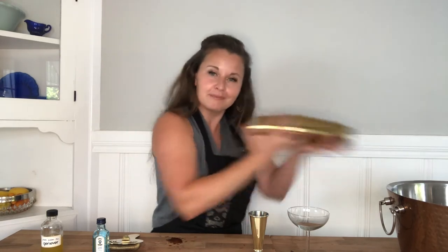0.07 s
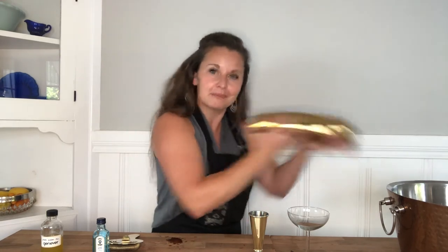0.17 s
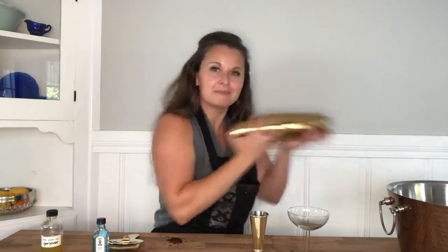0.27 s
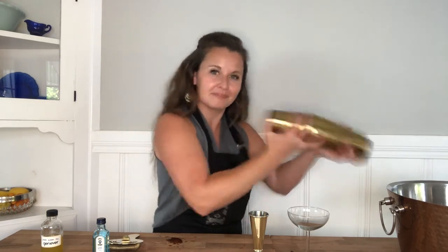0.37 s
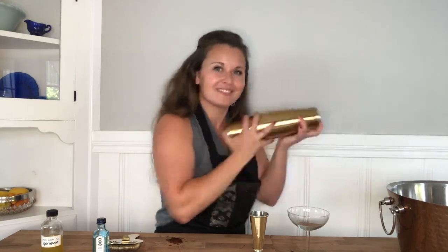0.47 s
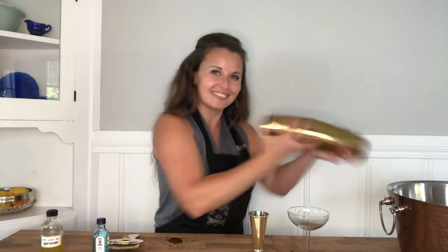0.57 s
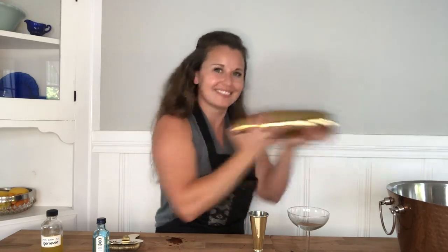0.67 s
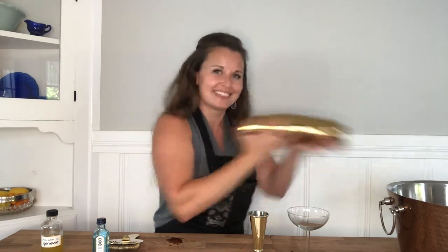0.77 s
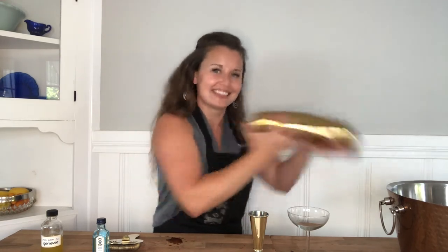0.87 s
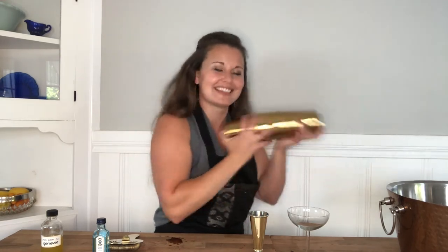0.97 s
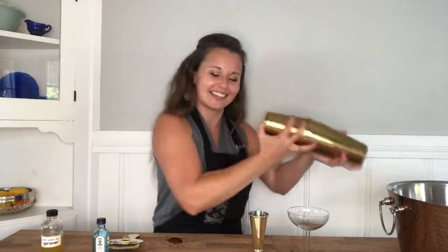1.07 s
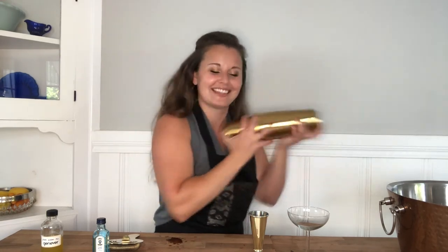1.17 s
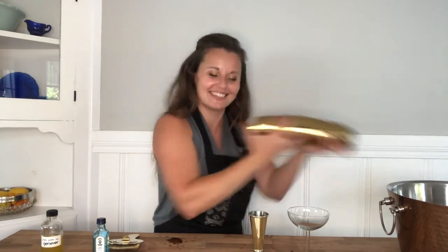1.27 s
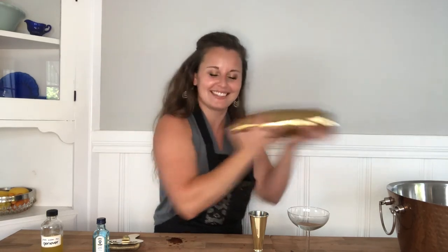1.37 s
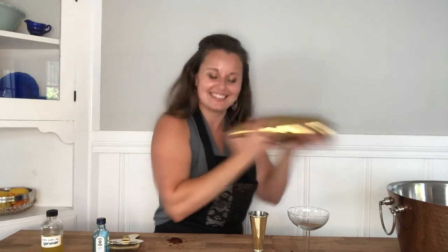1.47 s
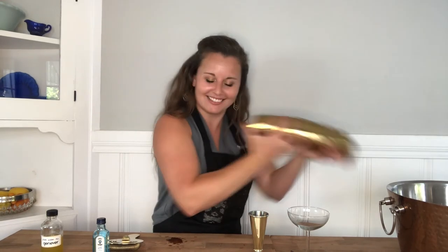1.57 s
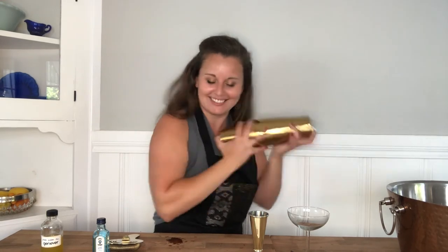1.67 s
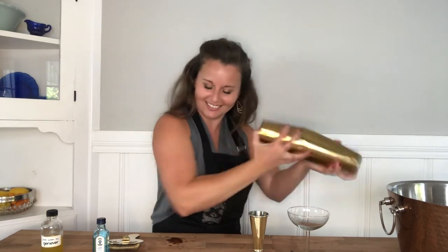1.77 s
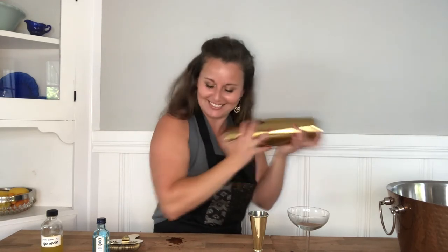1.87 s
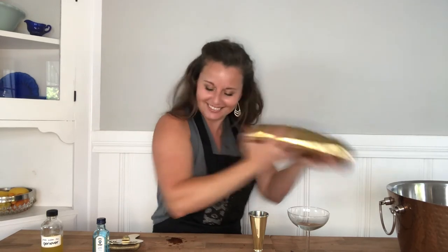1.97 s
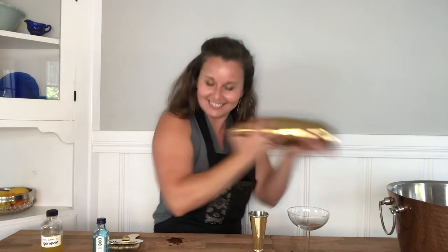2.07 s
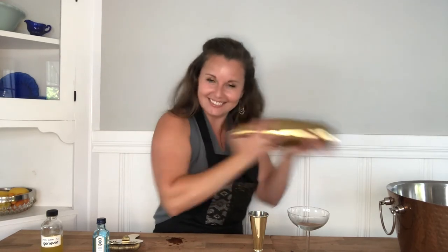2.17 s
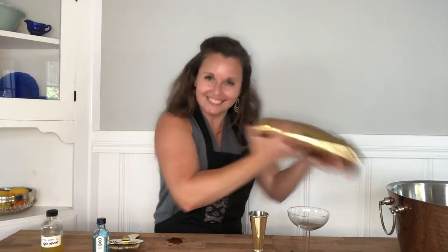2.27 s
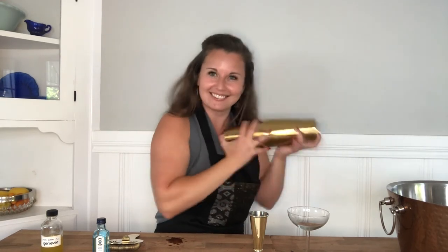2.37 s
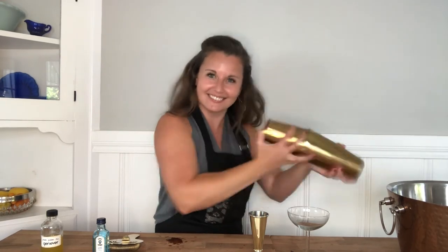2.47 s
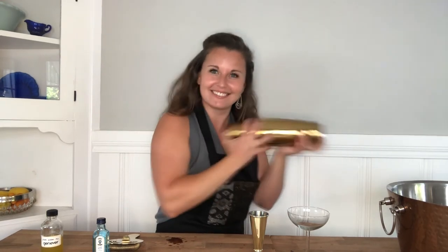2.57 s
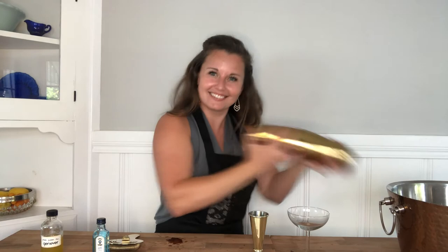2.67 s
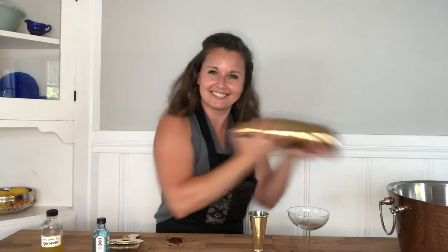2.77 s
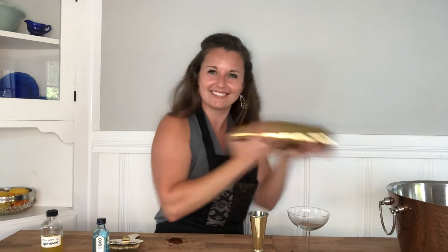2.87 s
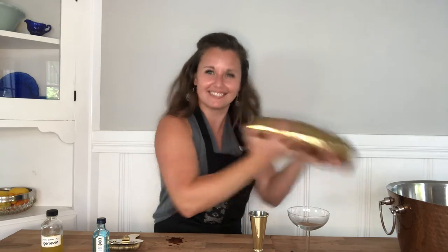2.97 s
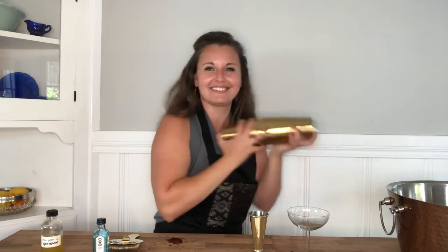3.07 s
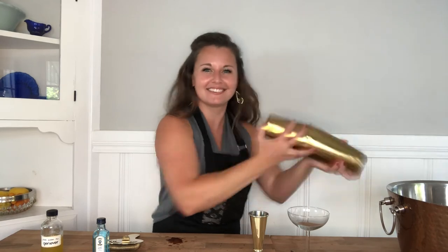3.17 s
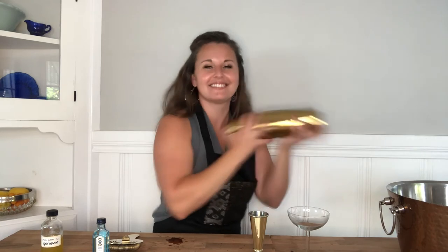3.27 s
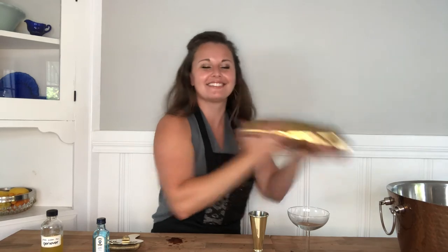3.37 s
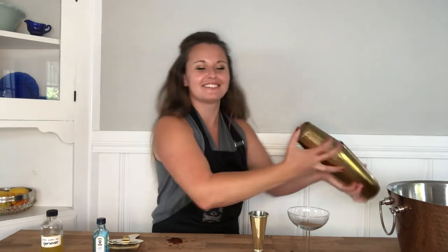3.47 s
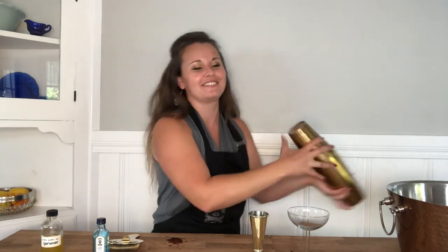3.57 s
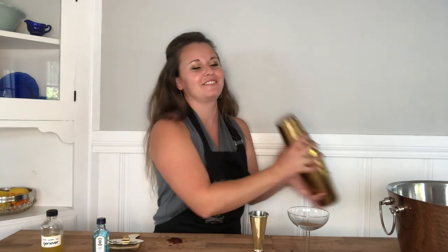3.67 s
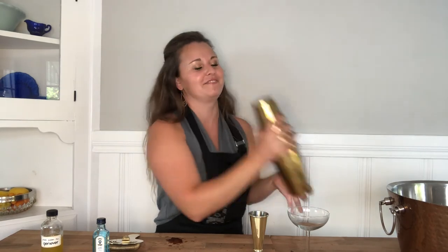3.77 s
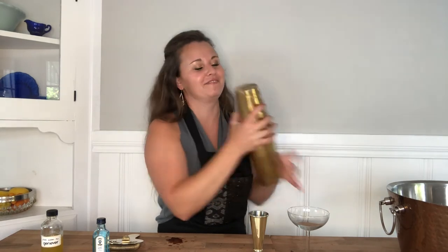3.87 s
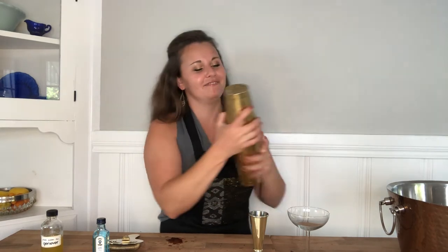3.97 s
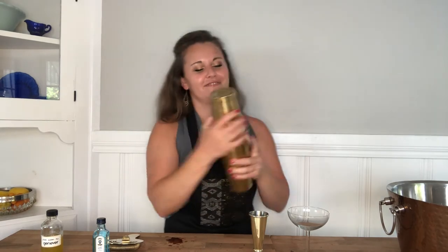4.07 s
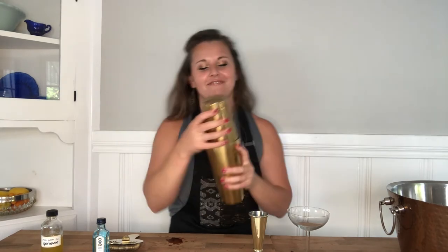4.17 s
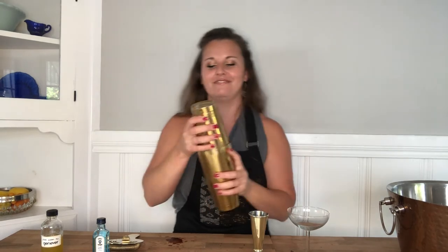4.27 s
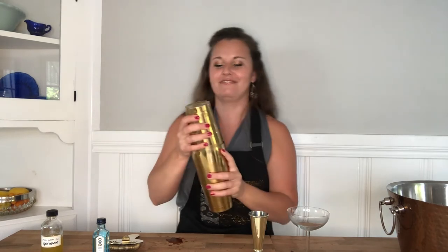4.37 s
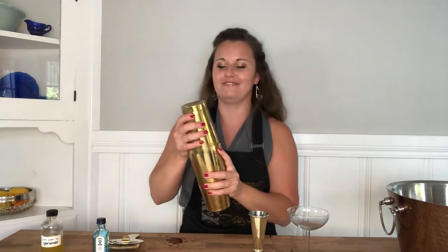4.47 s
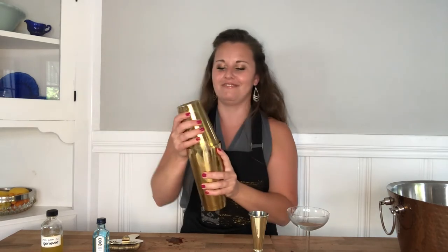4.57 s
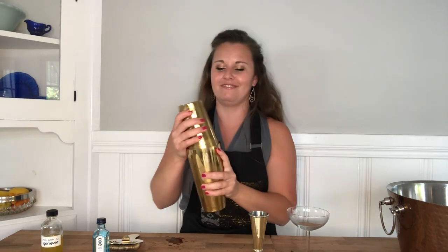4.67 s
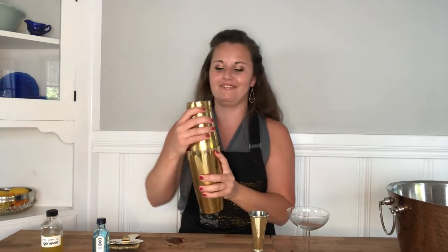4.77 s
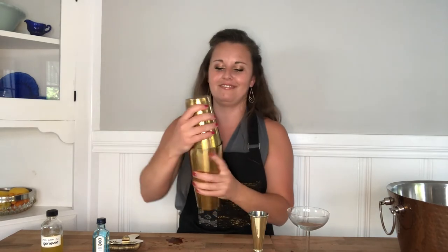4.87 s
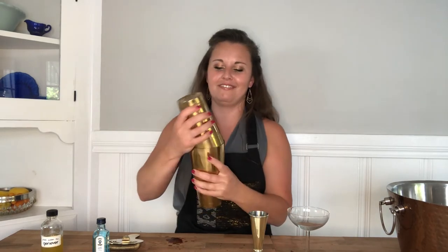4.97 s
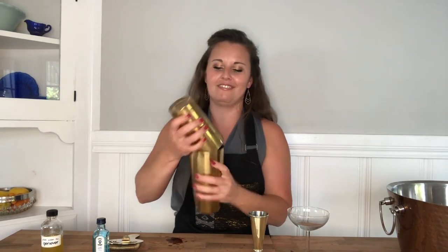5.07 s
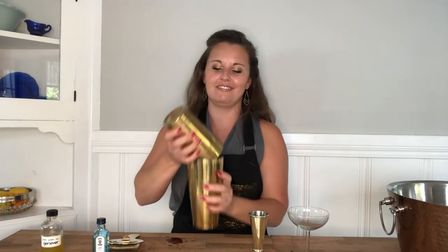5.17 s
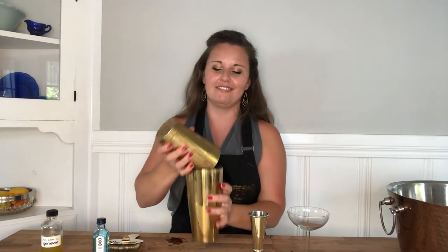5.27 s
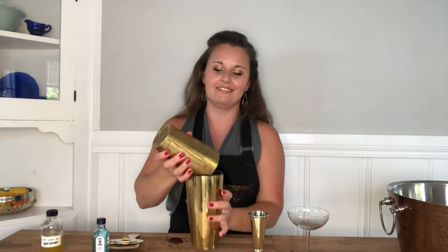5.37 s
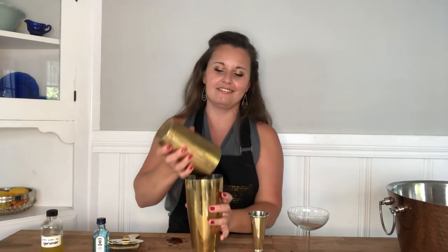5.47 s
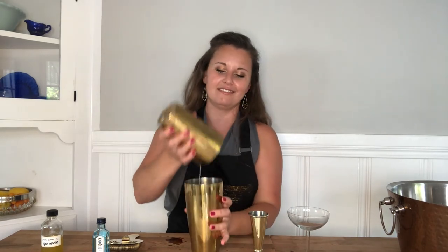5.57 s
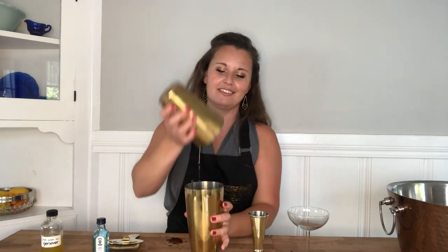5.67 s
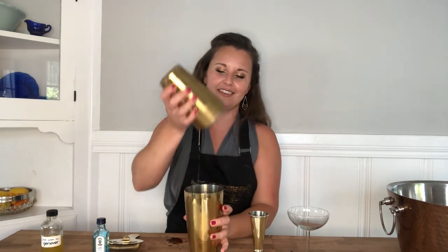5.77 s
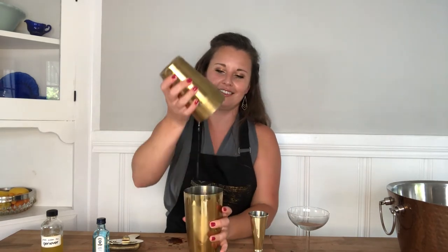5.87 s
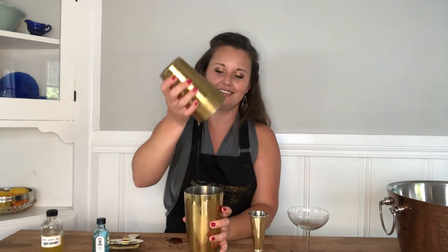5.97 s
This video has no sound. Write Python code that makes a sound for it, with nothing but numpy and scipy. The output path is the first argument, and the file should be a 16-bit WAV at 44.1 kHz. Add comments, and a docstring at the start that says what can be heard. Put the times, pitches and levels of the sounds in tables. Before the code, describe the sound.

A metal shaker full of ice is shaken hard, about ten slams a second, bright and crunchy with a little liquid slosh. It stops abruptly, leaving a few faint clinks. A palm blow pops the seal with a burst of ice, the tins scrape apart with hollow tones, and one lands on a wooden counter. Small plain room, a single overloaded microphone.

```python
"""Ice rattles in a two-part metal shaker, slamming about eleven times a second, then settles: random impacts on modal patches.
Separate cube strikes, slosh, gurgle and short wall hums join in; gliding noise resonances give the hollow tin tones.
A palm blow (dying sines, ice spray) breaks the seal; the tins scrape apart and hum; the big tin lands on a wooden counter.
A small plain room with faint steady noise; one microphone, in equal channels, that clips on the hardest slams."""
import sys
import numpy as np
from scipy import signal
from scipy.fft import rfft, irfft
from scipy.io import wavfile
from scipy.ndimage import uniform_filter1d

SR = 44100
rng = np.random.default_rng(int(sys.argv[2]) if len(sys.argv) > 2 else 0)


def unload_wav(signal):
    """Save mono or channel-first audio to the path in sys.argv[1] as 16-bit WAV at rate SR, clipped to [-1, 1]."""
    wavfile.write(
        sys.argv[1],
        SR,
        np.round(np.clip(np.atleast_2d(signal).T, -1, 1) * 32767).astype(np.int16),
    )


N = 265041

# loose ice on the move: (time [s], rattle level [dB], dull knock of whole cubes re rattle [dB],
# fine chips re rattle [dB])
ICE_MOTION = [(0, -18, -8, -8.5), (1.5, -19, -7, -7.5), (2.4, -19, -8.5, -6.5), (2.89, -20.5, -8.5, -6.5),
              (3.1, -19, -8, -6), (3.56, -18, -7, -8.5), (3.67, -24.5, -7, -10), (3.8, -33.5, -10.5, -15),
              (3.95, -34, -14, -7.5), (4.06, -44, -10, -16), (4.12, -52.5, -6, -27),
              (4.18, -41.5, -13, -25), (4.32, -56, -12.5, -17), (4.4, -51.5, -10.5, -27),
              (4.51, -67, -21, -30.5), (4.55, -63, -8, -17), (4.565, -31, -8, -1), (4.59, -34, -5, -6),
              (4.67, -43.5, -16, -27), (4.78, -35, -11, -12), (4.85, -43.5, -8, -10),
              (4.93, -36.5, -20, -8), (5.01, -46.5, -3, -13), (5.08, -33.5, -16, -12), (5.13, -45, -16, -9),
              (5.18, -39.5, -10, -19), (5.37, -58.5, -4, -30), (5.44, -62.5, 0.5, -20), (5.6, -74, 1, -8),
              (5.83, -85, 3, -2)]
# the drink: (time [s], slosh level [dB], deep gurgle level [dB])
DRINK_MOTION = [(0, -39, -43), (1, -41, -47.5), (2, -39.5, -52.5), (3, -40, -57), (3.55, -42.5, -58),
                (3.85, -59, -75), (4.1, -70, -81), (4.55, -79, -74), (4.59, -53, -43), (4.7, -68, -58),
                (5.05, -64.5, -60), (5.4, -64, -72), (5.8, -80, -76.5)]
# whole load arrives at one end: (time [s], rattle rise scale [dB], knock rise scale [dB],
# fade time constant [s], knock centre [Hz])
END_SLAMS = [(0, 7.5, 9, 0.028, 1795), (.105, 3.5, 1, 0.075, 1850), (.19, 5, 4, 0.077, 2006),
             (0.333, 2.5, 6, 0.064, 1493), (.414, 11, 7.5, 0.042, 2630), (0.467, 9, 11, 0.025, 2060),
             (0.571, 6, 4., 0.035, 1720), (.66, 3.5, -2.5, .03, 1580), (0.701, 9.5, 8, 0.037, 2010),
             (.81, 5, 7.5, 0.022, 1612), (0.906, 4, 5.5, 0.06, 2016), (1.036, 6, 4.5, 0.091, 1825),
             (1.136, 5, 8.5, 0.055, 2156), (1.285, 8, 5, 0.033, 1620), (1.39, 5.5, 3, 0.07, 1910),
             (1.506, 6.5, 4, 0.11, 1980), (1.64, 5.5, 6.5, 0.056, 2260), (1.76, 7.5, 6, 0.06, 1870),
             (1.842, 6.5, 8.5, 0.068, 2287), (1.946, 7, -1.5, 0.026, 2230), (2., 6.5, 1, 0.049, 1890),
             (2.065, 2, 4, 0.045, 1796), (2.119, 10, -0.5, 0.029, 1794), (2.235, 4.5, 3.5, 0.04, 1826),
             (2.335, 6.5, 6, 0.033, 2176), (2.46, 7.5, 7, 0.044, 2205), (2.55, 8, 7, 0.071, 1844),
             (2.66, 4, 4.5, 0.061, 2010), (2.75, 4.5, 0, 0.052, 2430), (2.81, 6.5, 8, 0.022, 2210),
             (2.905, 6, 3.5, 0.074, 1614), (3.008, 4.5, 6.5, 0.078, 2740), (3.155, 9.5, 7.5, 0.03, 2060),
             (3.241, 6.5, 5.5, 0.12, 2040), (3.285, 4.5, 8.5, 0.019, 2216), (3.399, 6, 7.5, 0.028, 2290),
             (3.506, 5, 2.5, 0.03, 1820), (3.527, 6, 2.5, 0.063, 1830), (3.639, 5, 8, 0.02, 1500),
             (3.76, 3, 6, 0.077, 2220)]
# radiation of the filled, hand-damped tin: (frequency [Hz], relative level [dB per Hz])
WALL_RADIATION = [(150, -52.5), (250, -29.5), (600, -8), (800, -32), (1200, -2), (1800, -1), (3200, -6.5),
                  (4500, 1.5), (5400, -3), (6500, 0.5), (7700, 0.5), (8800, -3), (11300, -9),
                  (12300, -28.5), (14500, -19), (15600, -34)]
# faint room noise spectrum: (frequency [Hz], relative level [dB per Hz])
HUSH_SPECTRUM = [(25, -9.5), (60, -0.5), (120, 2.5), (350, -8.5), (700, -9), (1300, -10), (2500, -19.5),
                 (7500, -22), (9000, -30), (15600, -39)]
# echo decay: (frequency [Hz], t60 [s])
ROOM_DECAY = [(150, 0.083), (1000, 0.28), (4000, 0.36), (8000, 0.26), (14000, 0.4)]
# single cubes striking the wall: (time [s], level [dB], centre of the ring [Hz])
CUBE_STRIKES = [(0.1055, -1, 4590), (0.124, -4, 4410), (0.186, 1, 6150), (0.2264, -1, 4500),
                (0.244, 1.5, 4410), (0.3359, 2.5, 3530), (0.4155, -8, 7310), (0.4512, 6.5, 5170),
                (0.5694, -4, 6160), (0.6638, -1, 6320), (0.689, -3, 7650), (0.7065, 5, 6180),
                (0.8167, -6, 4290), (0.837, 0, 6090), (0.9114, -4, 4420), (0.9346, 2, 6150),
                (1.0365, -1, 7710), (1.1364, -11, 7080), (1.298, -3, 4720), (1.3924, -7, 7360),
                (1.5074, -6, 7130), (1.5306, 0, 7330), (1.7629, 1, 7720), (1.8334, 2, 7640),
                (1.8536, 8.5, 8200), (1.9475, -9, 6700), (1.9755, -6, 6380), (2.003, 0, 7170),
                (2.0673, 4.5, 7400), (2.1241, 0, 7200), (2.1292, -2, 6460), (2.2283, 1.5, 6830),
                (2.3394, -16, 7320), (2.358, 1.5, 4510), (2.44, -1, 4900), (2.4602, 2, 7400),
                (2.5565, -8, 7760), (2.578, 3, 6060), (2.6628, -5, 4400), (2.7054, 2.5, 7300),
                (2.7482, -9, 7210), (2.7764, 4, 7430), (2.816, -3, 7100), (2.9108, -9, 6020),
                (3.0127, 0, 7300), (3.0206, -2, 4420), (3.058, -10, 5910), (3.1226, 3.5, 5880),
                (3.1603, -4, 4300), (3.2454, -12, 7240), (3.2873, 0, 6020), (3.367, -5, 8010),
                (3.505, -13, 6710), (3.5274, -4, 7150), (3.5887, -3, 7150), (3.6494, -8, 5080),
                (3.7579, -11.5, 2880), (3.8188, -13.5, 2770), (3.8625, -8, 4230), (3.92, -29, 4680),
                (3.932, -13, 7830), (3.9578, -14, 2780), (3.976, -16, 4600), (4.146, -26, 2650),
                (4.1657, -26, 4640), (4.1834, -38, 4700), (4.2024, -38, 3150), (4.2154, -25.5, 2640),
                (4.383, -34.5, 5810), (4.4037, -39, 6220), (4.5726, -5.5, 4340), (4.7028, -15, 4600),
                (4.7654, -31, 4730), (4.7754, -25, 4210), (4.8788, -26, 4890), (5.0225, -31, 4150),
                (5.034, -20, 3820), (5.0794, -21, 6130), (5.1527, -34, 6230), (5.1662, -21, 4320),
                (5.1797, -18, 4060), (5.3148, -39, 6560), (5.426, -44, 3060), (5.5397, -49, 3050)]
# one free part of the wall rings on: (time [s], main tone level [dB], frequency [Hz], t60 [s])
WALL_HUMS = [(0.428, -15.5, 2510, 0.18), (1.052, -19.5, 1754, 0.15), (1.145, -12, 2320, 0.054),
             (1.165, -15, 1872, 0.12), (2.79, -15, 2270, 0.072), (3.159, -21, 1760, 0.15),
             (3.28, -14, 1856, 0.18), (3.321, -17.5, 1790, 0.21), (4.34, -59, 137, 0.19),
             (4.97, -52, 138, 0.17)]
# hollow resonances stirred by sliding ice and draining drink: (start [s], length [s],
# first frequency [Hz], last frequency [Hz], level [dB])
HOLLOW_GLIDES = [(3.76, 0.24, 482, 475, -51), (3.715, 0.36, 624, 663, -51.5), (3.68, 0.19, 1100, 1150, -45),
                 (3.85, .25, 2740, 2820, -42.5), (3.95, 0.14, 1160, 1260, -54),
                 (4.073, 0.22, 606, 610, -63), (4.123, 0.19, 1880, 1860, -56.5),
                 (4.14, 0.1, 2760, 2730, -52), (4.334, 0.11, 660, 645, -61.5), (4.38, .17, 1900, 1880, -69),
                 (4.604, 0.37, 364, 340, -45), (4.69, 0.19, 580, 663, -52), (4.73, 0.22, 1700, 1730, -43),
                 (4.896, 0.15, 346, 354, -52.5), (4.578, 0.083, 1145, 1310, -42),
                 (4.93, 0.13, 1095, 1150, -51.5), (4.921, 0.12, 1800, 2100, -49),
                 (5.008, 0.15, 2005, 1950, -42.5), (5.026, 0.25, 1570, 1570, -47),
                 (5.049, 0.14, 328, 370, -40), (5.15, 0.23, 2130, 2060, -52),
                 (5.214, 0.27, 348, 345, -57.5), (5.193, 0.43, 786, 786, -57.5),
                 (5.436, 0.079, 335, 350, -53), (5.459, 0.28, 776, 722, -52.5),
                 (5.46, 0.25, 572, 622, -59.5), (5.493, .18, 2080, 2070, -72.5)]
# seal-breaking blow: (thump level [dB], spray level [dB], spray rise time constant [s], spray t60 [s])
SEAL_BLOW = (-32, -20.5, 0.0076, 0.23)
# modes of the palm thump: (frequency [Hz], relative level [dB], t60 [s])
PALM_MODES = [(55, -13, 0.34), (134, -1.5, 0.35), (174, 4.5, 0.23), (340, 8, 0.1), (386, 4, 0.16)]
# modes of the wooden counter: (frequency [Hz], relative level [dB], t60 [s])
COUNTER_MODES = [(65, -21.5, .4), (130.7, -8.5, 0.16), (183, -15.5, 0.2), (230, -16, 0.21), (340, -2, 0.16),
                 (358.2, -8.5, 0.61), (454, -7.5, 0.067), (540, -3, .06), (625, -8, 0.12),
                 (707, -3.5, 0.077), (835, -15, 0.089), (1130, -11.5, 0.044), (1405, -31, 0.12)]
# the tin lands and rocks: (time [s], level [dB], frequency this contact favours [Hz],
# narrowness [dB per octave squared])
RIM_CONTACTS = [(5.849, -15, 400, 1), (5.882, -12.5, 710, 38), (5.896, -26.5, 350, -0.5),
                (5.915, -23.5, 400, 1), (5.975, -28.5, 452, 8)]

STOP_S = 3.65  # shaking ends
RATTLE_HZ, SETTLED_RATTLE_HZ, SETTLED_KNOCK_HZ = 5870, 4900, 1650  # base centres
CLUMP_DB, CLUMP_S, ROAM_OCTAVES = 0.5, 0.0068, 0.12  # impacts clump and roam over the wall
SLOSH_WAVER_DB, GURGLE_WAVER_DB, WAVER_S = 2.5, 2.5, 0.049  # rms; the drink surges at random
SLOSH_SURGE, CHIP_SURGE = 0.36, 0.3  # slosh share of knock rise; chips' extra share of rattle rise
SNAP_FOCUS_DB, SOFT_FOCUS = 3.0, 0.13  # dB per octave squared at 0 dB; added per dB softer
SNAP_DB, SHIMMER_DB, CRACK_KNOCK_DB = -3, -11, -22  # peaks re strike level
HOLLOW_RISE, HOLLOW_FADE_DB = 0.32, -15  # share of length spent swelling; fade reached at the end
SEAL_S, THUMP_LEAD_S = 4.573, 0.0039  # spray peak; the palm lands just before
HUSH_DB = -65  # rms
EDGE_HZ = 15640  # upper band limit


def amp(db):
    """Decibels to amplitude."""
    return 10 ** (np.asarray(db) / 20)


def evened(x):
    """Scale to rms 1."""
    return x / np.sqrt(np.mean(x ** 2) + 1e-20)


def read(points, hz):
    """Interpolate a spectrum table over log frequency."""
    f, value = np.transpose(points)
    return np.interp(np.log(hz + 1), np.log(f + 1), value)


def curves(rows):
    """Interpolate each table column over time."""
    s, *columns = np.transpose(rows)
    return [np.interp(np.arange(N) / SR, s, column) for column in columns]


def waver(span_s):
    """Slow random curve, rms 1: noise averaged twice over the span."""
    size = round(span_s * SR)
    once = uniform_filter1d(rng.standard_normal(N), size)
    return evened(uniform_filter1d(once, size))


def add(mix, s, sound):
    """Mix in a sound at s seconds, cut at the end."""
    part = mix[round(s * SR):][:len(sound)]
    part += sound[:len(part)]


def ring(modes, rise_s, size=SR // 2):
    """Sum of dying sines with a soft start."""
    t = np.arange(size) / SR
    tones = sum(amp(db - 60 * t / t60) * np.sin(2 * np.pi * hz * t) for hz, db, t60 in modes)
    return tones * (1 - np.exp(-(t / rise_s) ** 2))


def patch(lo_hz, hi_hz, cycles, centre_hz, focus_db, count=30):
    """One wall spot: random dense modes, favoured near a centre, each dying within some cycles; energy 1."""
    hz = rng.uniform(lo_hz, hi_hz, count)
    t60 = cycles / hz
    focus = focus_db * np.log2(hz / centre_hz) ** 2
    db = read(WALL_RADIATION, hz) - focus - 10 * np.log10(t60)
    keep = signal.butter(6, [0.92 * lo_hz, 1.03 * hi_hz], "bandpass", fs=SR, output="sos")
    sound = signal.sosfilt(keep, ring(np.transpose([hz, db, t60]), 1e-4, size=3072))
    return sound / np.linalg.norm(sound)


def pelt(lo_hz, hi_hz, cycles, per_s, spread_db, level_db, centre_hz, focus_db, scatter_octaves, count=30):
    """Random impacts of uneven size, scattered over the wall spots that ring near centre_hz."""
    size = amp(spread_db * np.minimum(rng.exponential(1, N), 4))
    size = size * (rng.random(N) < per_s / SR)  # keep only the moments of impact
    drive = size * amp(level_db) / np.sqrt(np.mean(size ** 2))
    centres = np.geomspace(lo_hz, hi_hz, count)
    target_hz = centre_hz * 2 ** (scatter_octaves * rng.standard_normal(N))
    spot = np.searchsorted(centres[:-1], target_hz)
    out = np.zeros(N)
    for k, hz in enumerate(centres):
        out += signal.oaconvolve(drive * (spot == k), patch(lo_hz, hi_hz, cycles, hz, focus_db))[:N]
    return out


def slams():
    """Quick rise and slower fall of level at each end of a stroke, for rattle and knock."""
    rise_db, t = np.zeros((2, N)), np.arange(SR // 4) / SR
    for s, rattle_db, knock_db, fade_s, _ in END_SLAMS:
        shape = (1 - np.exp(-t / 0.0013)) * np.exp(-t / fade_s)
        add(rise_db[0], s, rattle_db * shape)
        add(rise_db[1], s, knock_db * shape)
    return rise_db


def rattle():
    """The load of ice and drink: five kinds of impact, from deep gurgle to fine chips."""
    ice_db, dull_db, chips_db = curves(ICE_MOTION)
    slosh_db, gurgle_db = curves(DRINK_MOTION)
    rattle_rise_db, knock_rise_db = slams()
    clump_db = CLUMP_DB * waver(CLUMP_S)  # shared by all the ice
    sharp_db = ice_db + rattle_rise_db + clump_db
    heavy_db = ice_db + knock_rise_db + clump_db

    t = np.arange(N) / SR
    s, *_, knock_hz = np.transpose(END_SLAMS)
    latest = np.maximum(np.searchsorted(s, t, "right") - 1, 0)
    dull_hz = np.where(t < STOP_S, knock_hz[latest], SETTLED_KNOCK_HZ)
    bright_hz = np.where(t < STOP_S, RATTLE_HZ, SETTLED_RATTLE_HZ) * 2 ** (ROAM_OCTAVES * waver(WAVER_S))

    bright = pelt(2900, 7700, 88, 5000, 1.6, sharp_db - 1, bright_hz, 17.0, 0.4)
    knock = pelt(879, 2800, 44, 1200, 0.84, heavy_db + dull_db - 1, dull_hz, 17.7, 0.3)
    slosh_db = slosh_db + SLOSH_SURGE * knock_rise_db + SLOSH_WAVER_DB * waver(WAVER_S)
    slosh = pelt(380, 850, 27, 540, 1.9, slosh_db, 570, 15.0, 0.4, count=12)
    gurgle_db = gurgle_db + GURGLE_WAVER_DB * waver(WAVER_S)
    gurgle = pelt(215, 380, 36, 340, 1.6, gurgle_db, 270, 3.2, 0.08, count=8)
    chips_db = sharp_db + chips_db + CHIP_SURGE * rattle_rise_db - 2.5
    chips = pelt(7900, 15600, 120, 6000, 4.5, chips_db, 11000, 2.2, 0.3, count=16)
    return bright + knock + slosh + gurgle + chips


def hush():
    """Steady faint room air: noise shaped in the spectrum."""
    z = rfft(rng.standard_normal(N))
    shape = amp(read(HUSH_SPECTRUM, np.fft.rfftfreq(N, 1 / SR)))
    return amp(HUSH_DB) * evened(irfft(z * shape, N))


def tail():
    """Sparse echo taps of random sign, each band dying at its own speed; energy 1."""
    taps = np.zeros(SR)
    at = np.arange(200, SR - 20, 20)
    taps[at + rng.integers(0, 20, len(at))] = rng.choice([-1., 1.], len(at))
    hz, t, z = signal.stft(taps, SR, nperseg=256)
    decay = amp(-60 * t / read(ROOM_DECAY, hz)[:, None])
    out = signal.istft(z * decay, SR, nperseg=256)[1]
    return out / np.linalg.norm(out)


def room(x):
    """The shaker keeps moving, so the sound is handed round three sets of echoes."""
    turn = 2 * np.pi * 1.3 * np.arange(N) / SR
    out = np.zeros(N)
    for k in range(3):
        share = np.sqrt(2 / 3) * np.cos(turn + k * np.pi / 3)
        out += signal.fftconvolve(x * share, tail())[:N]
    return out


def cracks():
    """Each hard strike: a bright snap, the wall shimmering on near the same pitch, and a duller knock."""
    out = np.zeros(N)
    for s, db, hz in CUBE_STRIKES:
        snap = patch(2400, 15000, 30, hz, SNAP_FOCUS_DB - SOFT_FOCUS * db)
        knock = patch(850, 2500, 25, 1800, 3.0)
        shimmer = patch(2400, 12000, 400, hz, 30.0, count=60)
        layers = (SNAP_DB, snap), (SHIMMER_DB, shimmer), (CRACK_KNOCK_DB, knock)
        strike = sum(amp(part_db) * part / abs(part).max() for part_db, part in layers)
        add(out, s, amp(db) * strike)
    return out


def hums():
    """A freely ringing part of the tin: a main dying tone with two weaker neighbours."""
    out = np.zeros(N)
    for s, db, hz, t60 in WALL_HUMS:
        tones = [(hz, db, t60), (hz * 0.93, db - 6.0, t60), (hz * 1.3, db - 9.5, t60)]
        add(out, s, ring(tones, 0.0013))
    return out


def resonate(x, hz, width_hz):
    """Gliding resonance of gain 1: shift the curve hz down to zero, smooth, shift back."""
    turn = np.exp(2j * np.pi * np.cumsum(hz) / SR)
    r = np.exp(-np.pi * width_hz / SR)
    return 2 * (turn * signal.lfilter([1 - r], [1, -r], x / turn)).real


def hollows():
    """Noise through a gliding resonance, applied twice; higher ones are wider. Each swells, then fades."""
    out = np.zeros(N)
    for s, length_s, first_hz, last_hz, db in HOLLOW_GLIDES:
        u = np.linspace(0, 1, round(length_s * SR))
        hz = first_hz + (last_hz - first_hz) * u
        width_hz = 5 + 0.085 * first_hz  # per pass
        noise = rng.standard_normal(SR // 2)[:len(u)]
        tone = evened(resonate(resonate(noise, hz, width_hz), hz, width_hz))
        swell = np.sin(np.pi / 2 * np.minimum(u / HOLLOW_RISE, 1)) * amp(HOLLOW_FADE_DB * u ** 2)
        close = np.minimum(10 * (1 - u), 1)
        add(out, s, amp(db) * tone * swell * close)
    return out


def seal():
    """The palm thumps the joint and throws a quick spray of ice against the wall."""
    thump_db, spray_db, rise_s, t60 = SEAL_BLOW
    out, t = np.zeros(N), np.arange(N) / SR - SEAL_S
    add(out, SEAL_S - THUMP_LEAD_S, amp(thump_db) * ring(PALM_MODES, 0.0059))
    # exponential growth to the peak, then decay
    burst_db = spray_db + np.where(t < 0, 20 / np.log(10) * t / rise_s, -60 * t / t60)
    return out + pelt(1510, 11870, 42, 6000, 1.4, burst_db, 4000, 4.7, 0.62, count=10)


def landing():
    """The same counter modes for every touch, weighted by where the rim meets the wood."""
    out = np.zeros(N)
    for s, db, favoured_hz, narrow in RIM_CONTACTS:
        modes = [(hz, db + mode_db - narrow * np.log2(hz / favoured_hz) ** 2, t60)
                 for hz, mode_db, t60 in COUNTER_MODES]
        add(out, s, ring(modes, 0.0025))
    return out


def scene():
    """Direct sound, echoes and room noise, the same in both channels."""
    ice = rattle() + cracks() + seal()
    thuds = hums() + hollows() + landing()
    echoes = room(amp(-8.0) * ice + amp(-3.5) * thuds)
    mono = ice + thuds + echoes + hush()
    return np.array([mono, mono])


def record(dry):
    """Hard overload at full scale, then the band limit."""
    edge = signal.firwin(511, EDGE_HZ, window=("kaiser", 9), fs=SR)
    return signal.oaconvolve(np.clip(dry, -1, 1), edge[None], "same")


dry = scene()
out = record(dry)
unload_wav(out)
```